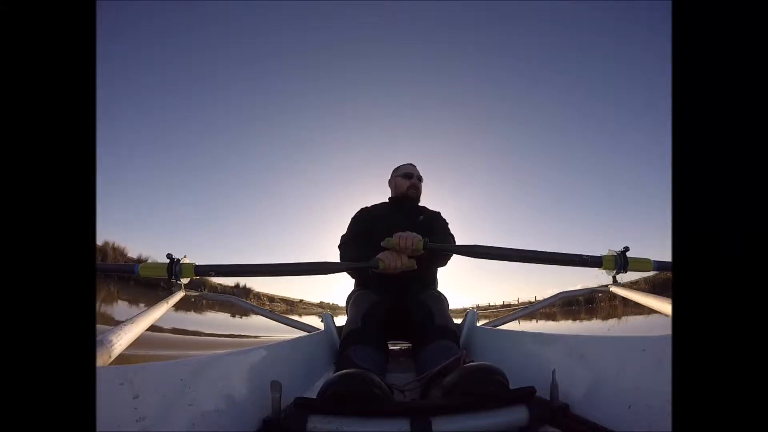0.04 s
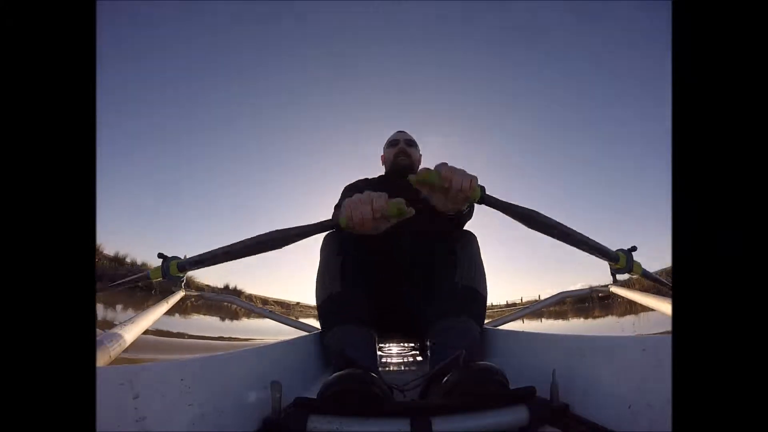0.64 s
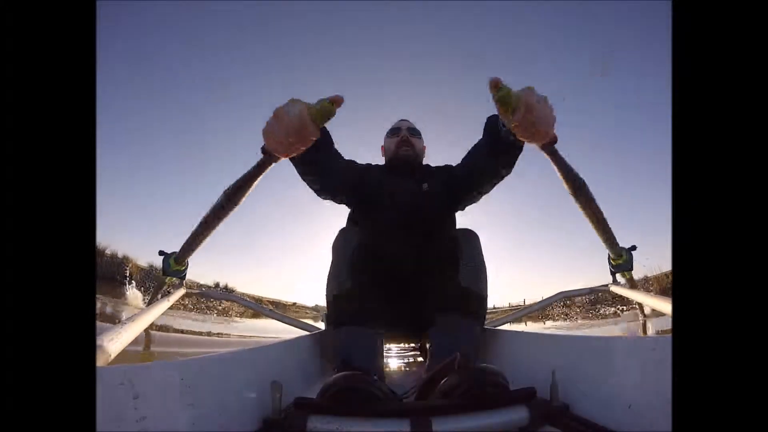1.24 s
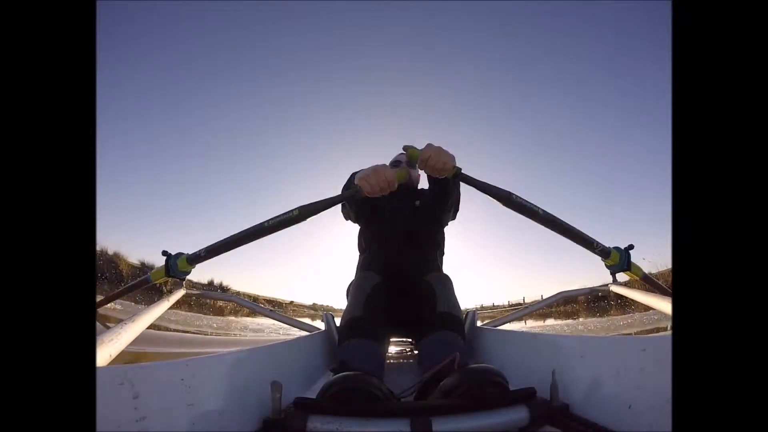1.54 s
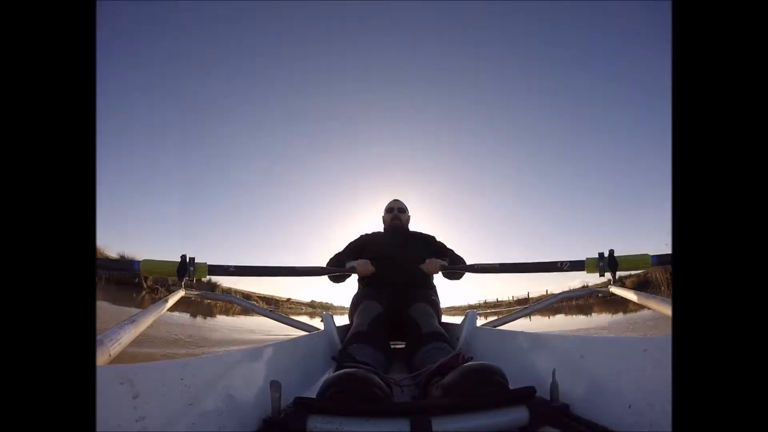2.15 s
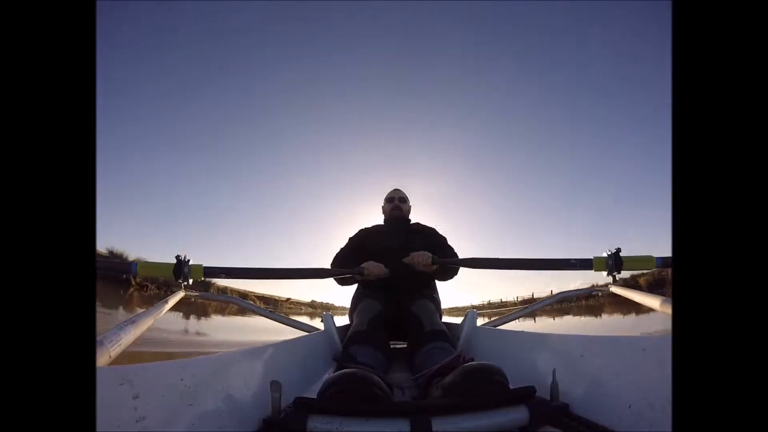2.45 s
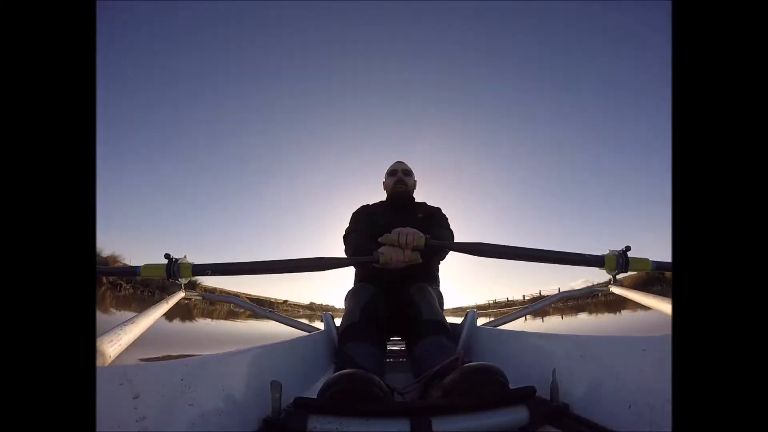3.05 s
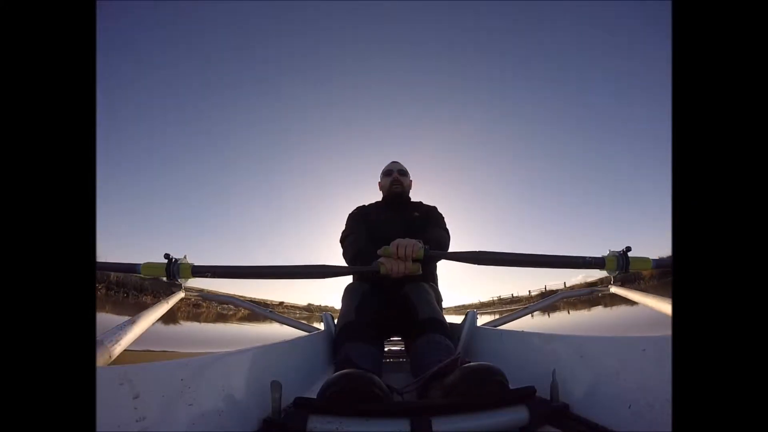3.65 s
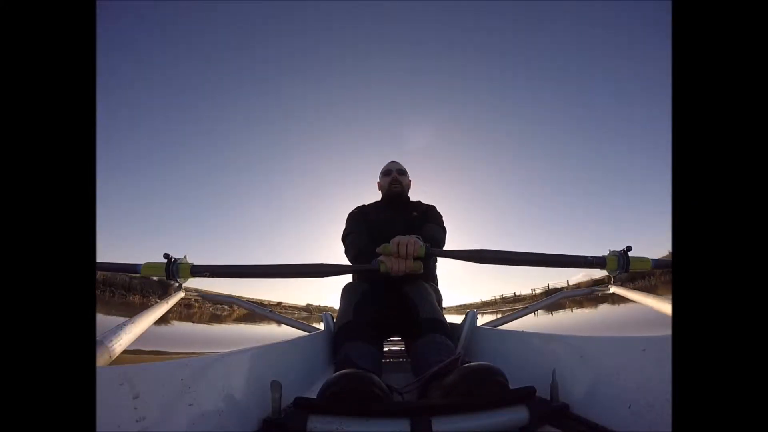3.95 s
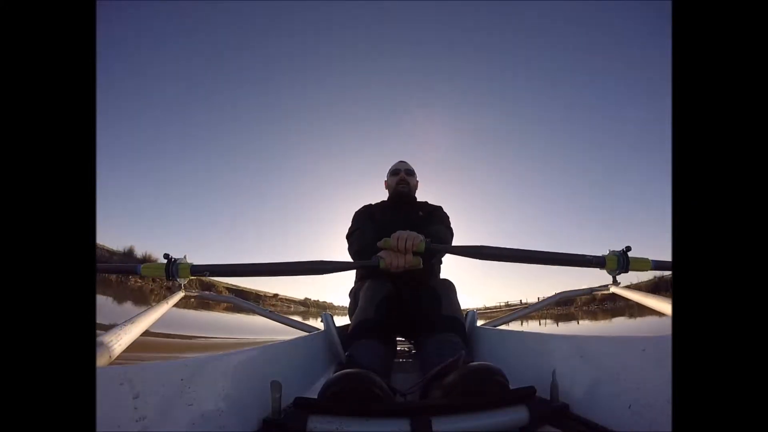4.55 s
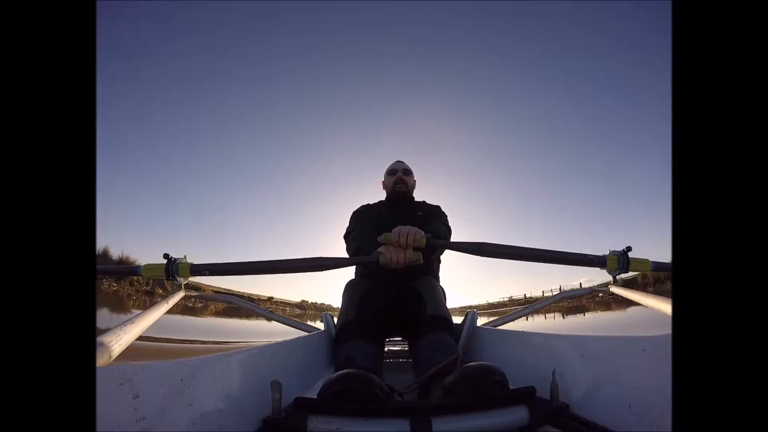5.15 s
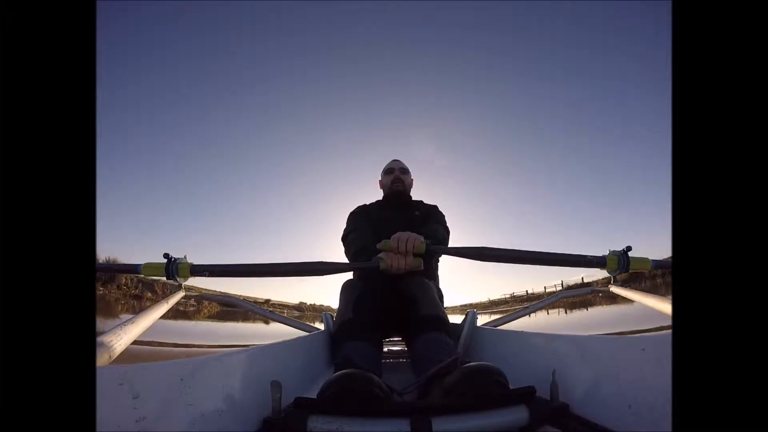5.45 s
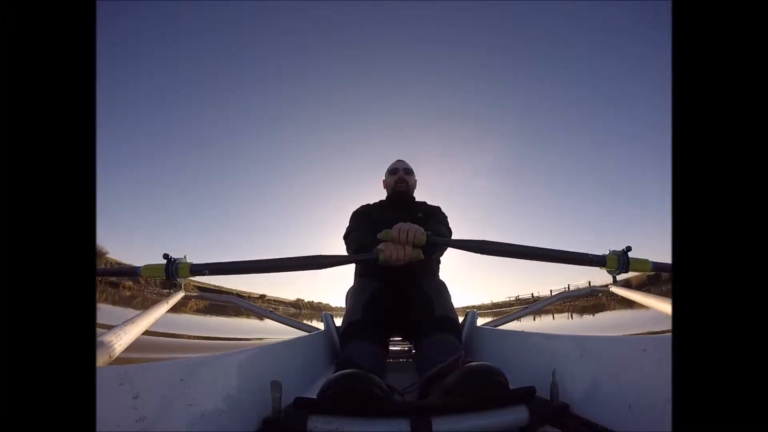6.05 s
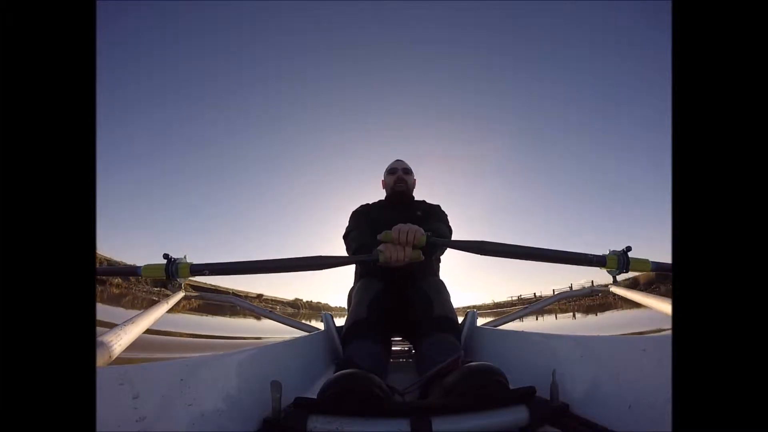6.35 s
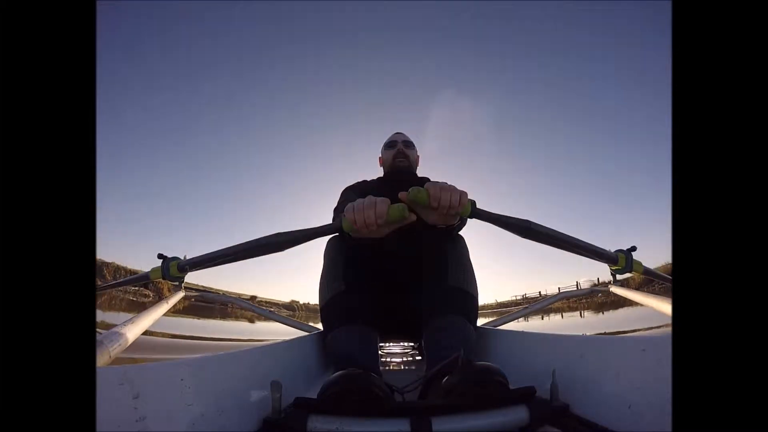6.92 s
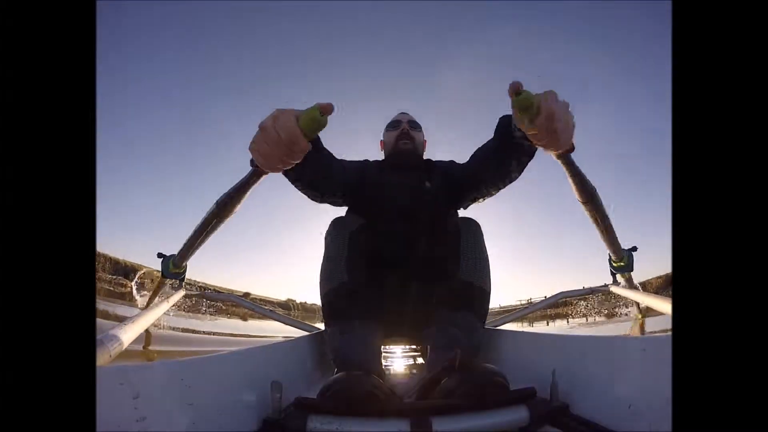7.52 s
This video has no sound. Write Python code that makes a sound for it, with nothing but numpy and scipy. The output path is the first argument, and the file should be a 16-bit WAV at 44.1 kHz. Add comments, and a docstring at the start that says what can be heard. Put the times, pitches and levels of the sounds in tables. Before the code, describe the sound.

A rowing boat is sculled on calm water, heard close through the hull from a microphone in a closed case. The seat rumbles forward, the oars knock in their holders and water rushes and gurgles, ending in a cluster of hollow clunks and a slosh. The boat glides with small ticks, bumps and faint lapping, then the seat rolls again and the oars knock into a second stroke.

```python
"""Sculling on calm water

A racing boat is heard from a closed case clamped to its hull, so nearly all sound comes through the boat.
The seat rumbles up its rails, water rushes along the hull, and the oars knock in their gates (holders)
at the catch, when the blades drop in, and at the finish, when they come out. Then the boat glides,
with small ticks from the oars and lapping water, until the next stroke."""
import sys
import numpy as np
from scipy import signal
from scipy.fft import rfft, irfft
from scipy.io import wavfile
from scipy.ndimage import uniform_filter1d

SR = 44100
rng = np.random.default_rng(int(sys.argv[2]) if len(sys.argv) > 2 else 0)


def waveform_to_disk(signal):
    """Save audio, clipped to [-1, 1], as 16-bit WAV at the path in sys.argv[1]."""
    frames = np.transpose(np.atleast_2d(signal))
    scaled = np.clip(frames, -1, 1) * 32767
    samples = np.round(scaled).astype(np.int16)
    wavfile.write(sys.argv[1], SR, samples)


N = 343098
TIME = np.arange(N) / SR

# The tones ("modes") that a knock sets ringing in the deck, the rigger (the arm that carries a gate)
# and the gate, plus a bright glint on top. Each row: pitch in Hz, width in Hz, relative level in dB.
DECK_MODES = [(247.4, 8.4, -3.5), (277.8, 8.2, -4.5), (307, 89, -13.5), (383.6, 15.1, -6),
              (434.4, 17.7, -14.5)]
RIGGER_MODES = [(712.3, 17.7, 3), (764, 95, 1.5), (775, 69, -8.5), (846, 30, 5), (1237, 44, -3.5),
                (1491, 48, -10.5), (1533, 130, -1.5), (1602, 35, 1.5)]
GATE_MODES = [(2240, 80, 4), (2350, 125, 6.5), (2467, 340, 7.5), (2750, 41, 13.5), (3120, 75, -17),
              (3390, 87, -3.5), (3860, 95, -20.5), (3780, 100, -23)]
GLINT_MODES = [(4900, 72, -1.5), (5150, 55, 3), (6040, 69, 0.5), (8960, 930, -23), (10600, 310, -27),
               (13500, 500, -24)]


def knocks():
    """An oar slips, loads hull and deck, then cracks home in its gate; bumps ring the same parts."""
    # The hull's deep tones. Each row: pitch in Hz, width in Hz, relative level in dB.
    hull_modes = [(114.7, 52, -3), (162.4, 6.36, 10.5)]
    out = np.zeros(N)
    for s, contact, hull_db, deck_db, rigger_db, gate_db in contacts():
        slip = blow(RIGGER_MODES + GATE_MODES, 2 * contact, rattle_db=-18, rattle_s=0.0086)
        deck = thud(DECK_MODES, contact, vary_db=1.44)
        hull = thud(hull_modes, contact, vary_db=-2.3)
        glint = blow(GLINT_MODES, contact, rattle_db=-25.5, rattle_s=0.0091)
        gate = blow(GATE_MODES, contact, rattle_db=-14.5, rattle_s=0.024)
        rigger = blow(RIGGER_MODES, contact, rattle_db=-18.5, rattle_s=0.033)
        glint_db = gate_db - 30 - 15 * np.log(contact / 0.003)   # a shorter contact is brighter
        add(out, s - .008, from_db(rigger_db - 24.5) * slip)
        add(out, s - .0045, from_db(hull_db - 2.5) * hull)
        add(out, s - .0035, from_db(deck_db - 3.5) * deck)
        add(out, s - .001, from_db(glint_db) * glint)
        add(out, s - .001, from_db(gate_db + 3) * gate)
        add(out, s - .001, from_db(rigger_db - 1.5) * rigger)
    return out


def contacts():
    """List each hit and rebound: start and contact in seconds, then hull, deck, rigger and gate dB."""
    # An oar lands in its gate. Each row: start in seconds, relative level in dB, contact time in
    # seconds, extra dB for the hull, extra dB for the deck, number of rebounds.
    clacks = [(1.043, -14.5, .002, -5.5, -28, 0), (1.05, -8, 0.00099, -0.5, -0.5, 0),
              (1.173, -20, 0.0084, 4, 2.5, 1), (1.203, -10, .003, -8.5, -16.5, 0),
              (2.172, -13.5, 0.0028, -1.5, 0, 0), (2.186, -14, 0.0052, 5, 7, 0),
              (2.205, -19.5, 0.0029, -8, -0.5, 0), (2.223, -13.5, 0.0024, -4.5, 2, 0),
              (7.352, -21.5, 0.0051, -11, -3, 0), (7.387, -12.5, 0.0039, 6.5, 4, 0),
              (7.476, -10.5, 0.0057, -9, -2, 0), (7.546, -18.5, 0.0041, 3, -6.5, 1)]
    # Seat and feet bump the hull. Each row: start in seconds, relative level in dB,
    # extra dB for the deck, extra dB for the rigger, number of rebounds.
    bumps = [(0.047, -51, 11, 6.5, 0), (1.227, -10.5, -15, -18, 0), (2.255, -12, -1, -26, 0),
             (2.378, -10.5, -9, -22, 1), (2.523, -17, 0, -10.5, 0), (2.791, -19, -6.5, -4, 1),
             (3.101, -23.5, -2, -12, 0), (3.348, -29.5, -0.5, -4, 0), (4.512, -15.5, -9, -5.5, 0),
             (5.283, -19, -9, -7.5, 1), (6.163, -37.5, -4.5, -7.5, 0), (7.561, -17.5, -20, -16, 0)]
    bump_contact_s, rebound_s, rebound_loss_db = 0.0044, 0.02, 1
    hits = [(s, contact, rebounds, db + np.array([hull_db, deck_db, 0, -5]))
            for s, db, contact, hull_db, deck_db, rebounds in clacks]
    hits += [(s, bump_contact_s, rebounds, db + np.array([0, deck_db, rigger_db, rigger_db - 12]))
             for s, db, deck_db, rigger_db, rebounds in bumps]
    return [(s + k * rebound_s, contact, *(levels - k * rebound_loss_db))
            for s, contact, rebounds, levels in hits for k in range(round(rebounds) + 1)]


def collar_ticks():
    """The loose collar around an oar taps its gate lightly, weaker each time it rocks back."""
    # The collar's rattles. Each row: start in seconds, relative level in dB, number of taps.
    rattles = [(0.207, -31.5, 1), (0.3, -30.5, 1), (0.991, -37.5, 1), (1.085, -50, 1), (1.851, -42, 1),
               (2.28, -24.5, 1), (2.325, -32.5, 2), (2.829, -36.5, 1), (3.597, -45, 1), (3.684, -53.5, 1),
               (3.86, -43, 1), (4.039, -39, 1), (4.439, -42, 1), (4.497, -49, 1), (4.56, -31, 1),
               (4.616, -41, 2), (5.295, -32.5, 1), (5.341, -26, 1), (5.376, -34, 1), (5.487, -48, 1),
               (6.565, -31.5, 1), (6.621, -34.5, 1)]
    rock_s, rock_loss_db, contact_s = 0.047, 4, 0.0022
    taps = [(s + k * rock_s, db - k * rock_loss_db)
            for s, db, count in rattles for k in range(round(count))]
    out = np.zeros(N)
    for s, db in taps:
        add(out, s, from_db(db - 18.5) * blow(GLINT_MODES, contact_s / 2, rattle_db=-41, rattle_s=.0079))
        add(out, s, from_db(db + 5.5) * blow(GATE_MODES, contact_s, rattle_db=-13.5, rattle_s=.012))
        add(out, s, from_db(db - 0.5) * blow(RIGGER_MODES, contact_s, rattle_db=-16, rattle_s=.019))
        add(out, s, from_db(db - 9) * thud(DECK_MODES, contact_s, vary_db=7))
    return out


def rowing():
    """How strong each part of a stroke is over time: seat slide, blade entry, leg drive, wash of water."""
    # The strokes. Each row: time of the catch in seconds, top speed of the seat from 0 to 1.
    strokes = [(1.052, 0.97), (7.388, 0.87)]
    slide = sum(speed * hump(s - 0.88, s - 0.22, s + 0.16) for s, speed in strokes)
    entry = sum(swell(s - .05, half=0.29, db=-0.5) for s, _ in strokes)
    drive = sum(hump(s, s + 0.4, s + 0.95) for s, _ in strokes)
    wash = sum(crest(s + 1.293, rise_db_per_s=22, fall_db_per_s=37.5) for s, _ in strokes)
    return slide, entry, drive, wash


def seat_and_hull(slide, entry, drive, wash, laps):
    """Seat wheels bump along the rails and make the hull drone, while the whole boat bends and hums."""
    # Tones driven by the rolling seat. Each row: pitch in Hz, width in Hz, relative level in dB.
    rolling_modes = [(110.2, 12.7, -7.5), (162.1, 13, 2.5), (261.3, 69, -14), (363.9, 15.3, -15.5),
                     (407.4, 4.7, -24)]
    # The rower's weight shifts and the boat lurches. Each row: peak in seconds, relative level in dB.
    lurches = [(2.3, -13), (4.598, -33.5), (5.38, -33)]
    lurch = sum(from_db(db) * crest(s, rise_db_per_s=166, fall_db_per_s=34) for s, db in lurches)
    roll_db = total_db(from_db(-53.5), from_db(-23) * slide ** 2.48, from_db(-32) * drive,
                       from_db(-9) * lurch, from_db(9) * laps)
    flex_db = total_db(from_db(-48.5), from_db(-25) * slide ** 1.17, from_db(-26.5) * entry,
                       from_db(-35.5) * drive, from_db(-26.5) * wash, lurch)
    flex_db += 2.6 * drift(per_s=11)
    drone = steady(resonate(grains(per_s=900, spread_db=2.5), rolling_modes), span=0.1)
    flex = steady(resonate(rng.standard_normal(N), [(38.32, 5.4, 4.5), (44.4, 11, -6.5)]), span=0.093)
    return from_db(roll_db + 1.5) * drone + from_db(flex_db + 0.1) * flex


def water(slide, entry, drive, wash, laps):
    """Wheel grit, bubbles and spray patter through the boat's thin skin; small waves lap against it."""
    # The skin's middle, high and highest tones. Each row: pitch in Hz, width in Hz, relative level in dB.
    skin_modes = [(669.6, 16, 6), (803, 102, 4.5), (905.4, 39, 1.5), (1219, 100, -4.5), (1472, 89, 0.5),
                  (1610, 55, -5)]
    spray_modes = [(2063, 110, 12.5), (2400, 150, 3), (2477, 240, 17), (3067, 110, 12), (3300, 480, 2.5),
                   (3570, 120, -4)]
    fizz_modes = [(4630, 1200, 5), (6150, 230, 2.5), (10360, 340, -5.5), (12800, 1800, -16)]
    rush_db = total_db(from_db(-66), from_db(-33.5) * slide ** 2.8, from_db(-46) * entry,
                       from_db(-45) * drive, from_db(-40) * wash)
    spray_db = total_db(from_db(-69), from_db(-44.5) * slide ** 1.78, from_db(-43.5) * entry,
                        from_db(-54.5) * drive, from_db(-40) * wash)
    fizz_db = total_db(from_db(-59.5) * slide ** 2.1, from_db(-70) * entry, from_db(-66) * wash)
    splash = swell(2.525, half=0.096, db=-59.5)   # the blades leave the water
    rush = steady(patter(skin_modes, per_s=1400, spread_db=2.5, patchy_db=3), span=0.057)
    spray = steady(patter(spray_modes, per_s=1600, spread_db=4, patchy_db=3), span=0.2)
    fizz = rms_one(resonate(grains(per_s=3900, spread_db=4), fizz_modes))
    rush *= from_db(rush_db + 0.56) + from_db(-1.5) * laps
    spray *= from_db(spray_db - 0.5) + from_db(1.5) * laps
    fizz *= from_db(fizz_db) + splash
    surge = from_db(1.2 * drift(per_s=45))
    return surge * (rush + spray + fizz)


def slosh(wash):
    """At the finish the wash slaps the hull with many soft pushes and sets the deck rumbling."""
    rumble = steady(resonate(grains(per_s=320, spread_db=6), DECK_MODES), span=0.04)
    return from_db(-27.5) * wash ** 1.8 * rumble


def bubbles():
    """A few clear plops, and clouds of small bubbles churned up by the blades."""
    # Single plops. Each row: start in seconds, pitch in Hz, relative level in dB.
    plops = [(2.042, 1130, -38), (3.213, 858, -40.5), (3.515, 867, -45.5), (3.52, 1590, -48),
             (4.12, 1455, -46)]
    # Bubble clouds. Each row: middle in seconds, half length in seconds, relative level in dB.
    gurgles = [(1.946, 0.33, -37), (2.456, 0.16, -59)]
    out = np.zeros(N)
    for s, hz, db in plops:
        add(out, s, from_db(db + 11.5) * bubble(hz, cycles=10.4, rise=0.0024))
    for s, half, db in gurgles:
        for when, size, strength in rng.uniform(-1, 1, size=(18, 3)):
            hz = 950 * 2 ** (-size / 2)   # larger bubbles ring lower
            add(out, s + half * when, from_db(db + 1.8 * strength) * bubble(hz, cycles=11, rise=0.01))
    return out


def bubble(hz, cycles, rise):
    """A bubble rings for a few cycles and climbs in pitch as it nears the surface."""
    t = TIME[:SR // 6]
    age = t * hz / cycles
    return np.sin(2 * np.pi * hz * t * (1 + rise * age)) * np.exp(-age) * (1 - np.exp(-4 * age))


def lapping():
    """How strongly small waves lap on the gliding hull over time."""
    # The waves. Each row: middle in seconds, half length in seconds, relative level in dB.
    wavelets = [(0.247, 0.08, -56.5), (3.224, 0.083, -61.5), (3.521, 0.069, -51), (3.91, 0.068, -59),
                (4.06, 0.054, -54), (5.826, 0.055, -51.5), (6.178, 0.017, -46.5)]
    return sum(swell(*wavelet) for wavelet in wavelets)


def hiss():
    """A faint, steady hiss in the background."""
    # The tone of the hiss. Each row: frequency in Hz, relative level in dB.
    spectrum = [(200, 8.5), (550, -7), (1200, -9.5), (3500, -15), (9000, -26), (15000, -34.5)]
    hz, db = np.transpose(spectrum)
    colour_db = np.interp(np.log(np.fft.rfftfreq(N, 1 / SR) + 1), np.log(hz), db)
    noise = irfft(rfft(rng.standard_normal(N)) * from_db(colour_db), N)
    return from_db(-54.5) * rms_one(noise)


def through_boat(x):
    """Paths through hull and rigger cancel at a few pitches, which hardly reach the case."""
    # The weakened pitches. Each row: pitch in Hz, width in Hz, level change in dB.
    dead_spots = [(74, 11, -5), (1827, 100, -25.5), (2766, 324, -24.5), (5010, 1000, -15)]
    for hz, width, db in dead_spots:
        narrow_band = signal.lfilter(*signal.iirpeak(hz, hz / width, fs=SR), x)
        x = x + (from_db(db) - 1) * narrow_band
    return x


def blow(modes, contact, rattle_db, rattle_s):
    """A rough hit, then a dying rattle of tiny bounces, rings one part; its loudest level is one."""
    t = TIME[:SR // 3]
    bounces = rng.random(len(t)) < 170 / SR
    rattle = signal.lfilter([1], [1, -np.exp(-1 / (0.0024 * SR))], bounces + 1e-18) + 0.13
    onset = 1 - np.exp(-2.4 * t / contact)
    push = onset * (np.exp(-t / contact) + from_db(rattle_db) * rattle * np.exp(-t / rattle_s))
    ring = resonate(push * rng.standard_normal(len(t)), modes)
    return ring / running_rms(ring, 0.0015).max()


def thud(modes, contact, vary_db):
    """One smooth push rings the low tones; each gets a random share, as if hit in a different spot."""
    t = TIME[:SR // 2]
    push = t * np.exp(-8 * t / contact)
    ring = 0
    for mode in modes:
        share = from_db(vary_db * rng.standard_normal()) * rng.choice([-1, 1])
        ring += share * resonate(push, [mode])
    return ring / running_rms(ring, 0.011).max()


def patter(modes, per_s, spread_db, patchy_db):
    """Small hits all over the skin: each tone gets its own, in clumps."""
    return sum(resonate(grains(per_s, spread_db), [mode]) * from_db(patchy_db * drift(per_s=25))
               for mode in modes)


def grains(per_s, spread_db):
    """Tiny random hits of very unequal size."""
    sizes = from_db(spread_db * np.minimum(rng.exponential(1, N), 5)) * rng.choice([-1, 1], N)
    return rms_one(sizes * (rng.random(N) < per_s / SR))


def resonate(force, modes):
    """Ring each tone with only the part of the force near its pitch, so the gaps between stay quiet."""
    out = 0
    for hz, width, db in modes:
        near_pitch = signal.butter(1, [hz / 1.092, hz * 1.1], "band", fs=SR, output="sos")
        fed = signal.sosfilt(near_pitch, force + 1e-18)
        decay = np.exp(-np.pi * width / SR)
        feedback = [1, -2 * decay * np.cos(2 * np.pi * hz / SR), decay ** 2]
        out += from_db(db) * (1 - decay ** 2) / 2 * signal.lfilter([1, 0, -1], feedback, fed)
    return out


def hump(start, peak, end):
    """A movement that gathers speed and loses it again, 0 to 1; times are in seconds."""
    return np.abs(np.sin(np.interp(TIME, [start, peak, end], [0, np.pi / 2, np.pi])))


def swell(s, half, db):
    """A bell-shaped rise and fall in level around time s."""
    return from_db(db) * np.exp(-((TIME - s) / half) ** 2)


def crest(s, rise_db_per_s, fall_db_per_s):
    """Build up to one at time s, then die away."""
    return from_db(np.minimum(rise_db_per_s * (TIME - s), fall_db_per_s * (s - TIME)))


def drift(per_s):
    """A slow random wander with a typical size of one."""
    return rms_one(np.interp(TIME * per_s, np.arange(1000), rng.standard_normal(1000)))


def steady(x, span):
    """Hold the slow level of a sound at one and keep its fast grain."""
    return x / running_rms(x, span)


def running_rms(x, span):
    """Level over a sliding window of span seconds."""
    return np.sqrt(np.abs(uniform_filter1d(x ** 2, max(int(span * SR), 1), mode="constant")) + 1e-20)


def rms_one(x):
    """Scale to an average power of one."""
    return x / np.sqrt(np.mean(x ** 2) + 1e-20)


def from_db(db):
    """Turn decibels into a gain to multiply by."""
    return 10 ** (np.asarray(db) / 20)


def total_db(*gains):
    """Level in dB of several unrelated sounds together."""
    return 10 * np.log10(sum(gain ** 2 for gain in gains) + 1e-20)


def add(out, s, sound):
    """Mix a sound in from s seconds on."""
    at = int(np.clip(s * SR, 0, N))
    out[at:at + len(sound)] += sound[:N - at]


def scene():
    """The rower's movements set how loud the rumble and water are; all but the hiss crosses the boat."""
    slide, entry, drive, wash = rowing()
    laps = lapping()
    boat = knocks() + collar_ticks() + seat_and_hull(slide, entry, drive, wash, laps)
    boat += water(slide, entry, drive, wash, laps) + slosh(wash) + bubbles()
    return (through_boat(boat) + hiss())[None]


def record(dry):
    """Clip any peak beyond full scale, then cut the highest treble."""
    cutoff_hz = 15200
    low_pass = signal.ellip(10, .1, 80, cutoff_hz, fs=SR, output="sos")
    return signal.sosfilt(low_pass, np.clip(dry, -1, 1))


dry = scene()
out = record(dry)
waveform_to_disk(out)
```